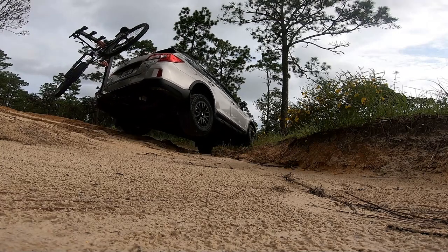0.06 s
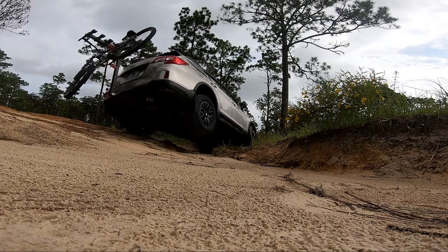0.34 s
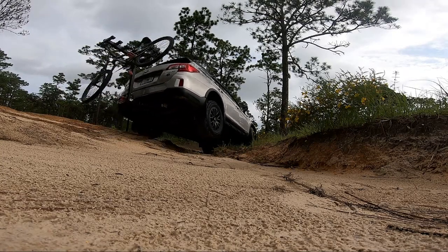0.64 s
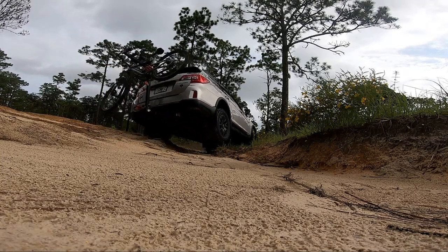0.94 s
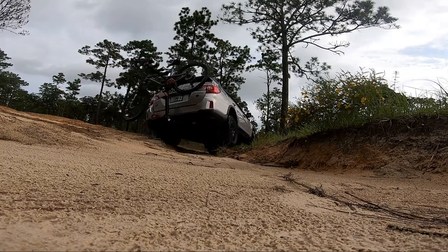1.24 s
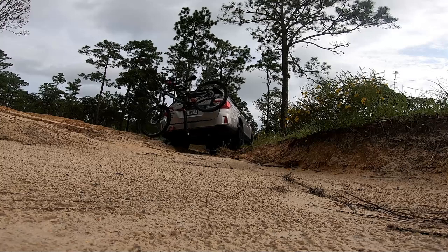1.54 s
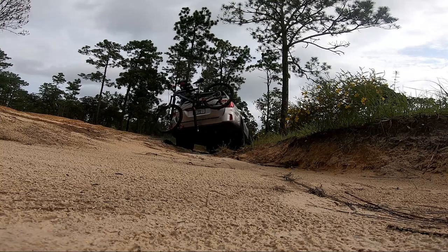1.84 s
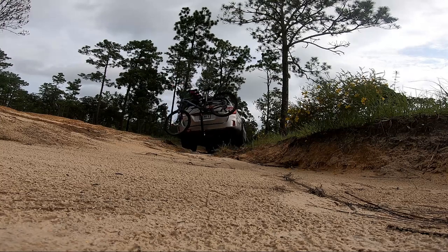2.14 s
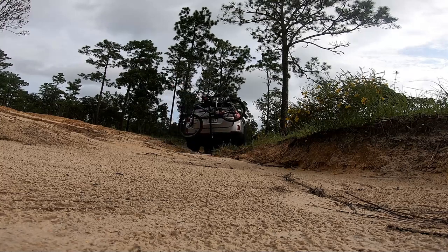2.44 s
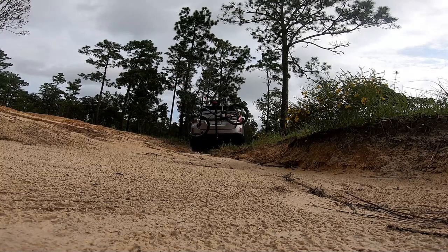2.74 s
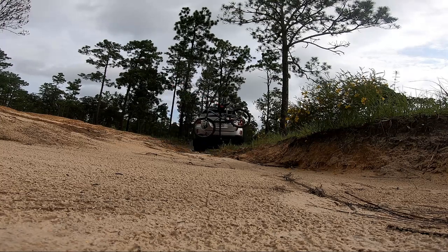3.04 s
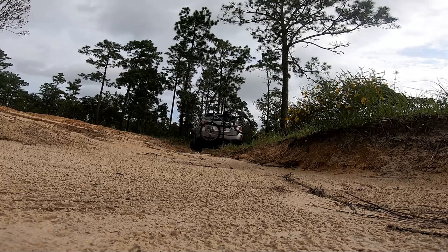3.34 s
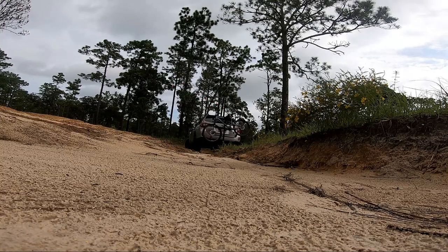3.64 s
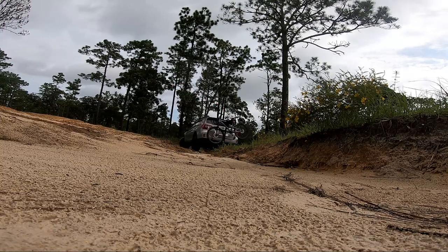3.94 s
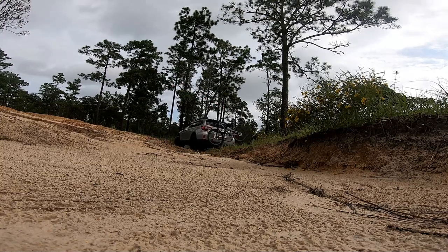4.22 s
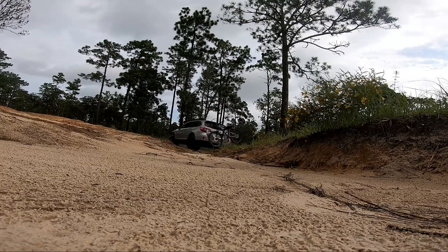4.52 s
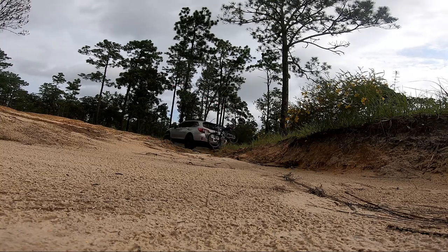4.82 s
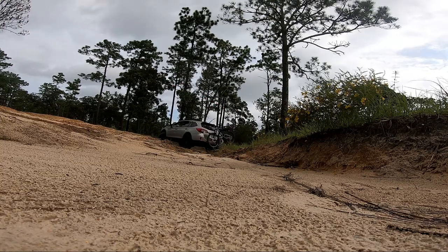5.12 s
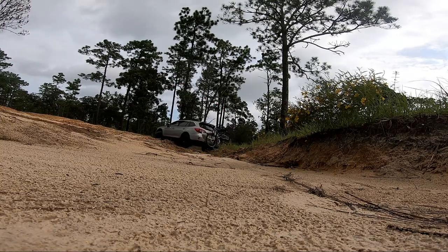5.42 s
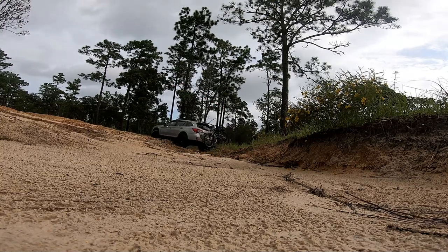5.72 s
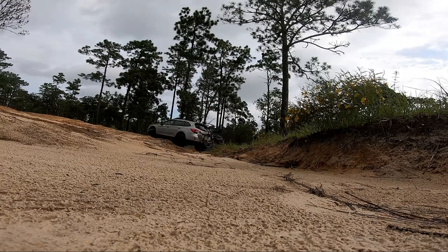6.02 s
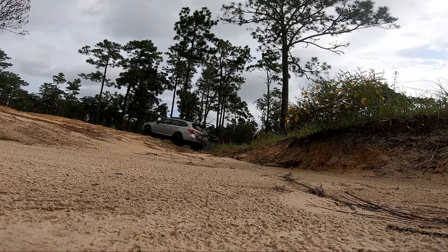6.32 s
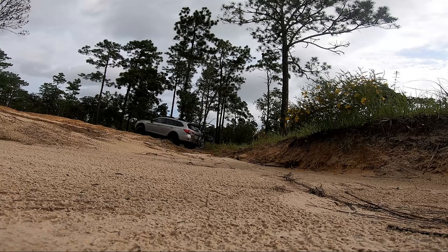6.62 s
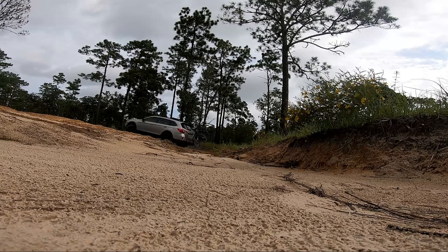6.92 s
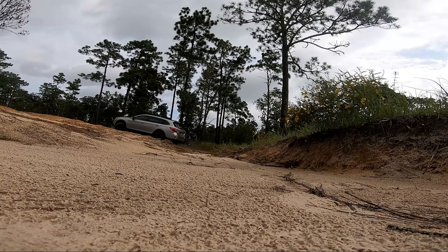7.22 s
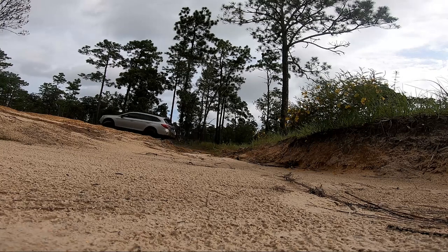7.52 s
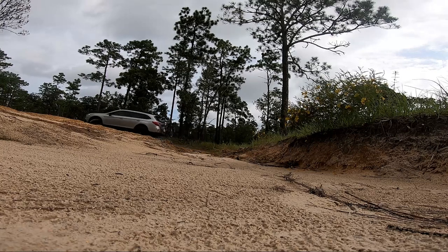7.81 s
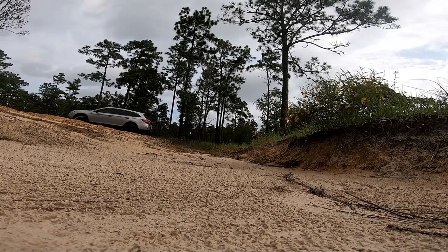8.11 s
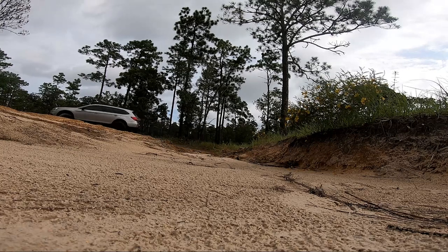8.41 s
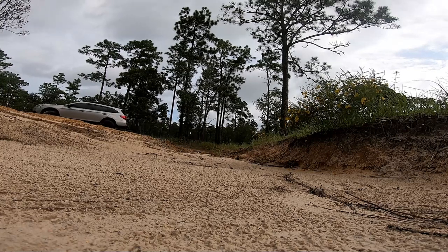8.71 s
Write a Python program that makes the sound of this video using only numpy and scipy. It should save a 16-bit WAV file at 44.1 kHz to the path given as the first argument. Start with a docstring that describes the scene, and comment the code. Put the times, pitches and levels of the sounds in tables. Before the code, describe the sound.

A car revs with clanking from its bicycle rack, drops to idle, then revs again and drives away over sand.

```python
"""Flat-four car on a sandy ledge.

The car revs over the ledge, drops to idle, then revs again and climbs away. Each firing puffs from
the exhaust; the engine bay hisses, the cooling fan hums, the driveline sings under load. A tyre slips,
the body lands with a thud, sand sprays and a bicycle rack on the tail clanks. Outdoors, near-mono."""
import sys
import numpy as np
from scipy import signal
from scipy.fft import rfft, irfft, next_fast_len
from scipy.io import wavfile
from scipy.ndimage import uniform_filter1d

SR = 44100
rng = np.random.default_rng(int(sys.argv[2]) if len(sys.argv) > 2 else 0)


def materialize(psi):
    """Save the field psi as 16-bit PCM at rate SR to the path in sys.argv[1].

    A 1-D psi becomes a single channel; in a 2-D psi each row is a channel.
    """
    bounded = np.clip(np.atleast_2d(psi).T, -1, 1)
    quanta = np.round(bounded * 32767).astype(np.int16)
    wavfile.write(sys.argv[1], SR, quanta)


N = 390726
TIME_S = np.arange(N) / SR
CUTOFF_HZ = 15500


def engine(rumble_db=-46.7, overrun_db_per_hz_per_s=0.05, puff_lag_firings=0.663):
    """Exhaust tones plus block rumble, gas rasp, mechanical churn and hiss, all pulsed by the crank."""
    # noise spectra: freq_hz, gain_db
    rumble_colour = [(25, -17.5), (55, -8), (95, 2), (160, -8), (235, -10.5), (280, -0.5), (360, -19),
                     (490, -12), (600, -21.5), (800, -24.5), (1000, -39)]
    rasp_colour = [(60, -8), (150, 1), (230, 4.5), (310, -9), (370, 10), (450, 4), (500, -4), (620, -4),
                   (720, -16), (810, -5.5), (900, -25), (1500, -38)]
    churn_colour = [(400, -14), (600, 7.5), (800, 2), (890, 0), (1050, 1), (1500, -8), (2000, -23.5),
                    (3500, -28)]
    hiss_colour = [(880, -25), (1500, -0.5), (1900, -4), (2300, -6.5), (3200, -6), (3450, -9), (4000, -11),
                   (4830, -16.5), (6800, -19), (7900, -18), (9100, -27.5), (9900, -22.5), (11000, -37.5),
                   (12200, -32), (14600, -47)]
    # level laws: base_db, db_per_firing_hz, loss_db_per_distance_doubling
    rasp_law = (-58.5, 0.49, 6.5)
    churn_law = (-68, 0.24, 10.8)
    hiss_law = (-72, 0.21, 9.3)
    # rasp trim: time_s, gain_db
    rasp_trim = [(0, -4.5), (.8, -5), (1.3, -3.5), (2.2, -1.5), (2.7, -4), (3.6, -4), (4.15, -1),
                 (4.7, -6.5), (5.3, -5), (6.1, -6), (7.2, -7.5), (7.8, -4)]
    # churn boost as the engine bay turns into view: time_s, gain_db
    side_on = [(5, 0), (8.3, 7)]
    (trim_db,), (side_on_db,) = in_time(rasp_trim), in_time(side_on)
    firing_hz = firing_rate()
    crank = 2 * np.pi * np.cumsum(firing_hz) / SR  # one cycle per firing
    puff_phase = crank - 2 * np.pi * puff_lag_firings  # the sharp edge trails the boom
    overrun_db = overrun_db_per_hz_per_s * np.minimum(np.gradient(firing_hz, 1 / SR), 0)
    rumble = from_db(rumble_db) * noise(rumble_colour) * puffs(crank, depth=0.41)
    gas_db = level_by(rasp_law) + overrun_db
    rasp = from_db(gas_db + trim_db) * noise(rasp_colour) * puffs(puff_phase, depth=0.67, banks=0.038)
    churn_db = level_by(churn_law) + overrun_db + side_on_db + 2.5 + 0.74 * drift(13)
    churn = from_db(churn_db) * noise(churn_colour) * puffs(puff_phase, depth=0.13, banks=0.045)
    hiss_db = level_by(hiss_law) - 0.14 + 0.6 * drift(12)
    hiss = from_db(hiss_db) * noise(hiss_colour) * puffs(crank, depth=0.071)
    pan = from_db([[-.3], [.3]])
    return pan * exhaust(firing_hz, crank, puff_phase, gas_db) + rumble + rasp + churn + hiss


def exhaust(firing_hz, crank, puff_phase, gas_db, overtone_trim_db=-0.52):
    """Boom plus overtones; roughest in the first rev and as the revs fall, steadiest on the climb."""
    # firing scatter: time_s, strength_ratio, timing_firings
    roughness = [(0, .05, .004), (.3, .11, .008), (.75, .09, .008), (1.3, .04, .004), (5.2, .04, .003),
                 (6.0, .025, .002), (7.35, .025, .002), (7.7, .055, .011), (8.1, .055, .011),
                 (8.4, .04, .004)]
    strength_scatter, timing_scatter = in_time(roughness)
    uneven_phase = puff_phase - 2 * np.pi * timing_scatter * drift(25)
    overtones = from_db(gas_db + overtone_trim_db) * pipe_overtones(firing_hz, uneven_phase)
    strength = 1 + strength_scatter * drift(40)
    return np.sqrt(2) * strength * (exhaust_boom(firing_hz, crank) + overtones)


def exhaust_boom(firing_hz, crank, muffler_hz=36):
    """The first five firing harmonics swell with effort and pass through the muffler."""
    # engine load: time_s, effort_db
    effort = [(0, -9.5), (.15, -6), (.45, -8), (.85, -11.5), (1.05, -20.5), (1.35, -29), (2.7, -26),
              (3.7, -28.5), (4.15, -21), (4.65, -22.5), (5.3, -13), (5.7, -10.5), (6.1, -5), (6.55, -4),
              (7.0, -7.5), (7.5, -8.5), (8.0, -13), (8.2, -21), (8.86, -20)]
    # one row per harmonic: base_db, db_per_effort_db
    harmonics = [(-22.5, 0.54), (-12.5, 1.26), (-13, 1.108), (-16.5, 0.95), (-25, 0.85)]
    # muffler response: freq_hz, gain_db
    muffler = [(29, -12), (36, -12.5), (44, -2), (58, 4), (70, 2), (88, 5.5), (110, 3), (140, -5),
               (175, -10.5), (210, -14), (238, -11.5), (280, -26.5), (350, -22.5)]
    effort_db, = in_time(effort)
    boom = 0
    for order, (base_db, slope) in enumerate(harmonics, 1):
        hz = order * firing_hz
        level_db = base_db + slope * effort_db + at_hz(muffler, hz)
        shift_rad = 2 * np.arctan((muffler_hz / hz) ** 2)
        boom -= from_db(level_db) * np.cos(order * crank + shift_rad)
    return boom


def pipe_overtones(firing_hz, phase, knee_hz=413, smear_rad=1.5, bank_skew_rad=0.4 * np.pi, wander=0.1):
    """Two puffs per bank in turn give quarter-order lines that sweep through the pipe resonances."""
    # exhaust lines: firing_order, facing_db, away_db
    lines = [(1.75, 2.5, -1.5), (2.25, -5.5, 0.5), (2.75, 2.5, 5), (3.25, 4, -2.5), (3.5, -2.5, -1),
             (3.75, -14, -0.5), (4.25, -4.5, 3), (4.5, -12, -8.5), (4.75, -6, -3), (5, 4, 2),
             (5.25, -3, -7), (5.75, -1, 2), (6, 2.5, 0.5), (6.25, 6, -0.5), (6.75, 1.5, 6), (7, 2, 2),
             (7.25, -1.5, -9.5), (7.75, 2.5, 4), (8, -5.5, 2), (8.25, -11.5, -11.5), (8.5, 0.5, -2),
             (8.75, 3.5, 0), (9, 1, 1), (9.25, -5.5, -2), (9.75, -9, -5.0), (10, -11.5, -9),
             (10.25, -10, -7), (10.75, 5, -2.5), (11, -13, -5), (11.75, -7.0, -2), (12.25, -0.5, -7.5),
             (12.75, 0.0, -5)]
    # pipe response: freq_hz, gain_db
    pipe = [(100, 3.5), (160, 1.5), (195, -10), (230, -9.5), (285, -9), (335, -8), (370, -11), (415, -8.5),
            (447, -8), (500, -14.5), (600, -12.5), (672, -12.5), (720, -23.5), (830, -16), (1000, -36)]
    # tailpipe aim at the listener: time_s, facing_share
    pipe_aim = [(.9, 1), (1.3, 0)]
    # puff shape: time_s, bank_imbalance_db, tilt_db_per_octave
    pulse_shape = [(0, 1, -6), (.85, 2.5, -21.5), (1.3, -2.5, -8), (4, -12.5, 6), (5.4, -4, -0.5),
                   (5.9, -3.5, -3.5), (6.65, -4, -3), (7.05, -1.5, -5.5), (7.9, 4.5, 8), (8.3, -5, -5.5)]
    facing, = in_time(pipe_aim)
    imbalance_db, tilt_db_per_octave = in_time(pulse_shape)
    overtones = 0
    for order, facing_db, away_db in lines:
        hz = order * firing_hz
        fraction = order - np.round(order)
        bank_line = fraction != 0
        line_db = away_db + facing * (facing_db - away_db) + at_hz(pipe, hz)
        line_db += tilt_db_per_octave * np.log2(np.maximum(hz / knee_hz, 1))
        line_db += imbalance_db * (bank_line and order < 5)
        gain = from_db(line_db) * (1 + wander * drift(0.55))
        offset_rad = bank_skew_rad * bank_line - np.pi * fraction + smear_rad * rng.standard_normal()
        overtones += gain * np.cos(order * phase + offset_rad)
    return overtones


def rack(rattle_trim_db=-2.5, rattle_t60_s=0.068, top_hz=9500):
    """Loose bicycle rack joints knock: a dry rattle and a clank at each blow."""
    # blows: start_s, rattle_db, tubes_db, latch_db, snap_db, snap_hz
    blows = [(0.468, -52, -60, -56, -50, 4570), (0.479, -47, -49, -54, -50, 4530),
             (0.492, -48, -53, -50, -49, 4650), (0.518, -52, -53, -52, -50, 4550),
             (0.531, -49, -51, -53, -51, 4960), (0.545, -38, -53, -54, -60, 4000),
             (0.644, -44, -58, -56, -57, 4600), (0.744, -47, -53, -68, -68, 4200),
             (.868, -54, -45, -54, -60, 5200), (0.93, -48, -44, -46, -60, 5360),
             (0.974, -47, -45, -44, -65, 5300), (1.19, -48, -42, -30, -60, 5300),
             (1.201, -46, -50, -41, -55, 5000), (1.459, -46, -55, -75, -77, 4300),
             (1.719, -42, -46, -62, -59, 3700), (1.751, -45, -49, -49, -46, 4160),
             (1.764, -51, -38, -56, -48, 2970), (1.792, -53, -46, -66, -69, 3600),
             (1.872, -44, -48, -56, -52, 2690), (1.895, -48, -48, -45, -52, 3000),
             (1.909, -52, -56, -50, -49.5, 3600), (1.964, -48, -54, -60, -66, 5000),
             (2.073, -50, -66, -64, -66, 4600), (2.358, -45.5, -48, -56, -61, 3420),
             (2.67, -63, -56, -69, -61, 3800), (2.729, -64, -53, -77, -73, 2920),
             (2.865, -50.5, -48.5, -62, -61.5, 6100), (2.977, -54, -57, -68, -73, 3650),
             (3.005, -57, -63, -70, -70, 2800), (3.823, -59, -57.5, -52, -64, 3220)]
    # rattling contact spectrum: freq_hz, gain_db
    rattle_colour = [(500, 5), (1000, 27.5), (3000, 11.5), (6000, -1), (9000, -16), (12000, -24),
                     (15000, -32)]
    starts_s, rattle_db = np.transpose(blows)[:2]
    out = fade(clicks_at(starts_s, rattle_db + rattle_trim_db), rattle_t60_s) * noise(rattle_colour)
    for start_s, _, *blow in blows:
        sound = clank(*blow)
        start = int(start_s * SR)
        out[:, start:start + sound.shape[1]] += sound
    return signal.sosfilt(signal.butter(6, top_hz, fs=SR, output="sos"), out)


def clank(tubes_db, latch_db, snap_db, snap_hz, snap_t60_s=0.063, chatter_t60_s=0.036, chatter_db=-21):
    """One joint snaps near its own pitch; its chatter rings the tubes and latch."""
    # rack modes: pitch_hz, gain_db, t60_s
    tube_modes = [(1070, -8.5, 0.036), (1440, -6.5, 0.046), (2470, -19.5, 0.11), (2660, -29, .3),
                  (2772, -20.5, 0.41), (2840, -16.5, 0.42), (2970, -19, 0.34), (3220, -19, .2),
                  (3311, -18, .15), (3520, -17, 0.11)]
    latch_modes = [(3980, -20, .04), (4270, -23.5, .08), (4610, -13.5, .04), (5290, -14, .04),
                   (5520, -13.5, 0.047), (6270, -23, .025), (7260, -25, .03), (8100, -18.5, .015)]
    width, spread_octaves, seating_scatter = 0.21, 0.27, 0.004
    age_s = TIME_S[:SR // 2]
    mid, side = rng.standard_normal((2, len(age_s)))
    contacts = mid + width * side * np.array([[1], [-1]])
    pitches_hz = np.minimum(snap_hz * 2 ** (spread_octaves * rng.standard_normal(5)), CUTOFF_HZ)
    snap = unit_rms(sum(ring(contacts, hz, t60_s=0.012) for hz in pitches_hz))
    out = from_db(snap_db - 60 * age_s / snap_t60_s) * snap
    chatter = from_db(chatter_db - 60 * age_s / chatter_t60_s) * contacts
    for modes, level_db in ((tube_modes, tubes_db), (latch_modes, latch_db)):
        for hz, mode_db, t60_s in modes:
            seated_hz = hz * (1 + seating_scatter * rng.standard_normal())
            out += from_db(level_db + mode_db) * ring(chatter, seated_hz, t60_s)
    return out


def tyre_shudder(peak_s=0.54, peak_db=-26.5, pitch_hz=81.1, wander=0.0067):
    """A slipping tyre shudders harder until it grips."""
    envelope = swell(peak_s, 0, peak_db, rise_db_per_s=60, fall_db_per_s=89)
    phase = 2 * np.pi * pitch_hz * np.cumsum(1 + wander * drift(24)) / SR
    return np.sqrt(2) * envelope * np.sin(phase)


def body_bumps(thud_t60_s=0.23, push_t60_s=0.0093, boom_t60_s=0.28):
    """Each suspension bump is a dull thud that sets one part of the body booming."""
    # bumps: start_s, push_db, boom_hz, thud_db
    bumps = [(1.196, -26.5, 102, -40), (1.617, -31, 26, -38), (1.758, -33, 176, -31.5),
             (2.34, -32, 226, -38), (4.225, -43, 176, -39.5)]
    # thud spectrum: freq_hz, gain_db
    thud_colour = [(50, -6.5), (170, -8.5), (280, -8), (400, -20), (1000, -27), (3000, -46.5)]
    starts_s, _, _, thud_db = np.transpose(bumps)
    out = fade(clicks_at(starts_s, thud_db), thud_t60_s, rise_s=0.0053) * noise(thud_colour)
    push_scale = np.log(1000) / (SR * 0.008)
    for start_s, push_db, boom_hz, _ in bumps:
        push = push_scale * fade(clicks_at(np.array([start_s]), push_db), push_t60_s)
        out += ring(push, boom_hz, boom_t60_s)
    return out


def sand(edge_db_per_s=499):
    """Rolling tyres spray sand and grind grit; scuffs add more of both."""
    # wheel scuffs: start_s, length_s, spray_db, grit_db
    scuffs = [(.475, 0.094, -63.5, -72), (.6, 0.56, -92, -61.5), (1.73, 0.22, -97, -77)]
    # level laws: base_db, db_per_firing_hz, loss_db_per_distance_doubling
    spray_law = (-99, 0.59, 2.2)
    grit_law = (-90.5, 0.27, 20.1)
    # sand spectra: freq_hz, gain_db
    spray_colour = [(3000, -30.5), (5500, 2), (7500, 4.5), (9000, -1.5), (9800, 1), (11000, -9.5),
                    (12400, -5), (15000, -17)]
    grit_colour = [(1500, -7), (2600, 3), (3300, 0.5), (4300, -22.5), (6000, -23), (8500, -14),
                   (11000, -31.5)]
    scuff_spray, scuff_grit = swells(scuffs, edge_db_per_s)
    spray = np.hypot(from_db(level_by(spray_law)), scuff_spray) * noise(spray_colour)
    grit = np.hypot(from_db(level_by(grit_law)), scuff_grit) * noise(grit_colour)
    return spray + grit


def spurt(start_s=1.62, length_s=0.072, level_db=-63.5, edge_db_per_s=750):
    """A short bright hiss as the tail drops."""
    # hiss spectrum: freq_hz, gain_db
    colour = [(4500, -12), (6000, -3), (8300, 2), (9900, 3), (10700, -10), (12400, -8), (15400, -19)]
    return swell(start_s, length_s, level_db, edge_db_per_s, edge_db_per_s) * noise(colour)


def fan(waver=0.0013, flutter_db=2.9):
    """Cooling fan blade tones waver in the open air; the upper ones are shaded as the car turns away."""
    # blade tones: pitch_hz, base_db
    tones = [(199.6, -45.5), (269.2, -58.5), (490, -64.5), (538.5, -64), (597.5, -70)]
    # gain of the lowest tone and of the upper tones: time_s, gain_db
    hum = [(0, 4), (1.2, -3.5), (1.85, 0.5), (2.5, -5.5), (3.1, -1.5), (3.6, 2.5), (4.3, 5.5), (5.3, 1.5),
           (5.7, 9.5), (6.6, 2), (8.3, -7.5)]
    shade = [(1.3, 4), (3.3, -0.5), (4.2, -10.5)]
    (hum_db,), (shade_db,) = in_time(hum), in_time(shade)
    rad_per_hz = 2 * np.pi * np.cumsum(1 + waver * drift(3.2)) / SR
    out = 0
    for k, (hz, base_db) in enumerate(tones):
        level_db = base_db + (shade_db if k else hum_db) + flutter_db * drift(1)
        out += from_db(level_db) * np.sin(hz * rad_per_hz)
    return np.sqrt(2) * out


def driveline(edge_db_per_s=28.5):
    """Two narrow resonances sing while the wheels pull."""
    # pulls: start_s, length_s, drone_db, whine_db
    pulls = [(0, 0.67, -56.5, -62.5), (4.05, 0.95, -51, -77.5), (5.22, 2.94, -65, -57.5)]
    # resonance spectra: freq_hz, gain_db
    drone_colour = [(290, -9.5), (318, -0.5), (335, 3), (355, -26.5)]
    whine_colour = [(720, -11), (775, -6), (815, -1), (850, -36.5)]
    drone, whine = swells(pulls, edge_db_per_s)
    return drone * noise(drone_colour) + whine * noise(whine_colour)


def firing_rate(flywheel_s=0.08):
    """Firings per second, smoothed by the flywheel."""
    # engine speed: time_s, firing_hz
    speed = [(0.0, 44.9), (0.17, 56.2), (.27, 58.6), (.37, 59.4), (0.64, 58.6), (.76, 54.8), (1.0, 43.1),
             (1.19, 35.4), (1.45, 30.5), (2.1, 28.6), (3.86, 28.9), (4.38, 35.5), (4.64, 34.0),
             (5.17, 37.6), (5.59, 46.0), (5.9, 58.2), (6.2, 66.5), (6.6, 70.5), (6.98, 66.2), (7.38, 65.1),
             (7.5, 66.1), (7.7, 60.3), (7.94, 55.1), (8.21, 41.1), (8.46, 35.2), (8.63, 34.9), (8.86, 37.2)]
    return uniform_filter1d(in_time(speed)[0], int(flywheel_s * SR), mode="nearest")


def level_by(law, idle_hz=29, far_m=22):
    """Level in dB that rises with engine speed and falls with distance."""
    # the car's path: time_s, distance_m
    path = [(0, 7.1), (.55, 8), (1.15, 11), (2.1, 11.2), (3, 16.3), (5, 18.7), (8.86, 17.7)]
    distance_m, = in_time(path)
    base_db, db_per_hz, db_per_doubling = law
    distance_loss_db = db_per_doubling * np.log2(distance_m / far_m)
    return base_db + db_per_hz * (firing_rate() - idle_hz) - distance_loss_db


def noise(colour):
    """Unit-rms stereo noise of a given spectrum, rolled off beyond its ends."""
    # left-right likeness: freq_hz, correlation
    likeness = [(100, 0.98), (550, 0.91), (1000, 0.5), (2300, 0.77), (5000, .7), (9000, 0), (12000, 0.03)]
    # left over right: freq_hz, gain_db
    lean = [(100, -0.5), (300, -0.8), (560, -3), (780, 0), (1000, 3), (1500, 2), (2200, 2.5), (8000, 0.1)]
    size = next_fast_len(N, True)
    hz = np.fft.rfftfreq(size, 1 / SR) + 1
    rolloff = np.minimum(1, hz / colour[0][0]) ** 2 * np.minimum(1, colour[-1][0] / hz) ** 2
    mid, side = rfft(rng.standard_normal((2, size)))
    alike = np.clip(at_hz(likeness, hz), 0, 1)
    pair = np.sqrt(1 + alike) * mid + np.sqrt(1 - alike) * side * [[1], [-1]]
    pan = from_db(at_hz(lean, hz) * np.array([[.5], [-.5]]))
    spectrum = pair * pan * rolloff * from_db(at_hz(colour, hz))
    return unit_rms(irfft(spectrum, size)[:, :N])


def puffs(phase, depth, banks=0):
    """Unit-rms swell once per firing; banks favours one bank's pair of firings."""
    return unit_rms(np.exp(depth * np.cos(phase) + banks * np.cos((phase - np.pi) / 4)))


def drift(rate_hz):
    """Slow random control, unit rms."""
    step, warmup = 40, 2000
    pole = np.exp(-2 * np.pi * rate_hz * step / SR)
    white = rng.standard_normal(N // step + warmup + 2)
    slow = signal.lfilter([1], [1, -2 * pole, pole * pole], white)[warmup:]
    return np.interp(np.arange(N) / step, np.arange(len(slow)), unit_rms(slow))


def ring(drive, hz, t60_s):
    """One mode: a unit click starts a decaying unit sine."""
    pole, step_rad = from_db(-60 / (t60_s * SR)), 2 * np.pi * hz / SR
    feedback = [1, -2 * pole * np.cos(step_rad), pole * pole]
    return signal.lfilter([0, np.sin(step_rad)], feedback, drive + 1e-18)


def clicks_at(times_s, level_db):
    """One impulse per time."""
    out = np.zeros(N)
    out[(times_s * SR).astype(int)] = from_db(level_db)
    return out


def fade(clicks, t60_s, rise_s=0.0006):
    """Attack-decay envelope from each click."""
    attack, decay = np.exp(-1 / (rise_s * SR)), from_db(-60 / (t60_s * SR))
    return signal.lfilter([1 - attack], np.convolve([1, -attack], [1, -decay]), clicks + 1e-18)


def swell(start_s, length_s, level_db, rise_db_per_s, fall_db_per_s):
    """Gain that rises until start_s, holds, then falls."""
    before_s = np.maximum(start_s - TIME_S, 0)
    after_s = np.maximum(TIME_S - start_s - length_s, 0)
    return from_db(level_db - rise_db_per_s * before_s - fall_db_per_s * after_s)


def swells(rows, edge_db_per_s):
    """One gain per level column, summed over rows."""
    return sum(np.array([swell(start_s, length_s, db, edge_db_per_s, edge_db_per_s) for db in levels_db])
               for start_s, length_s, *levels_db in rows)


def in_time(rows):
    """One interpolated control per column after time_s."""
    times_s, *columns = np.transpose(rows)
    return [np.interp(TIME_S, times_s, column) for column in columns]


def at_hz(points, hz):
    """Interpolate on a log-frequency axis."""
    freq_hz, value = np.transpose(points)
    return np.interp(np.log(np.maximum(hz, 1)), np.log(freq_hz), value)


def from_db(db):
    """Decibels to gain."""
    return 10 ** (np.asarray(db) / 20)


def unit_rms(x):
    """Scale to unit power."""
    return x / np.sqrt(np.mean(x ** 2) + 1e-20)


def scene():
    """The car and everything it shakes."""
    return engine() + fan() + driveline() + rack() + tyre_shudder() + body_bumps() + sand() + spurt()


def record(dry, port_hz=11, end_fade_s=0.004):
    """The right microphone port loses a little deep bass; short end fade, top cut."""
    right = signal.sosfilt(signal.butter(1, port_hz, "high", fs=SR, output="sos"), dry[1])
    pair = np.array([dry[0], right]) * np.minimum(1, TIME_S[::-1] / end_fade_s)
    return signal.sosfilt(signal.ellip(10, .1, 70, CUTOFF_HZ, fs=SR, output="sos"), pair)


dry = scene()
out = record(dry)
materialize(out)
```